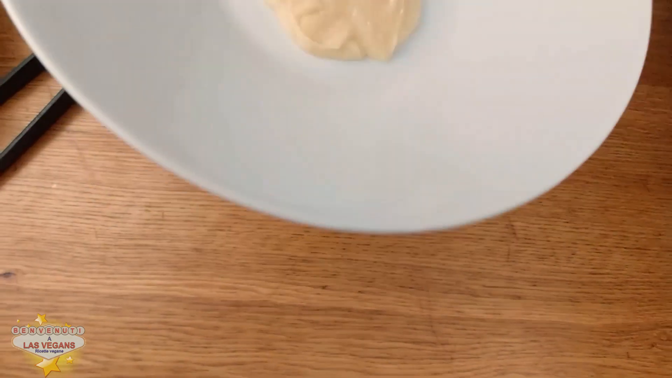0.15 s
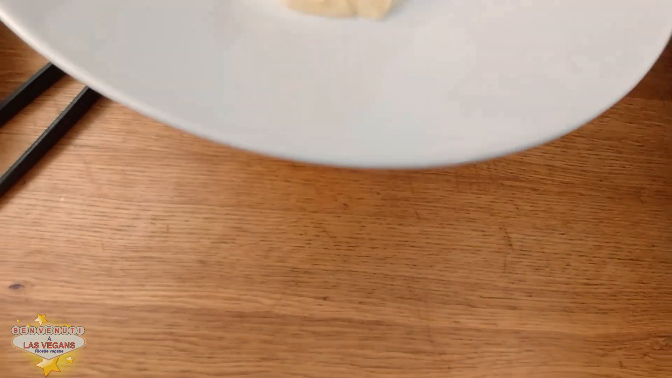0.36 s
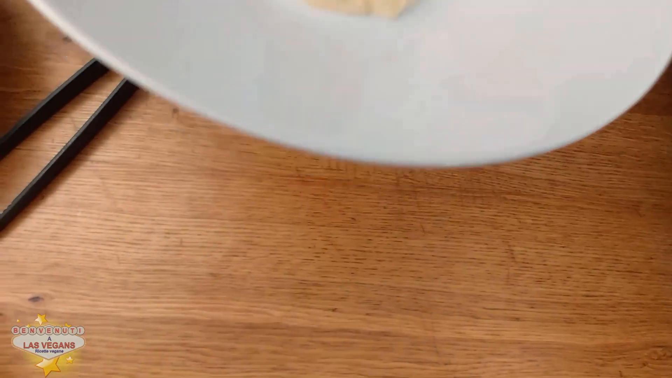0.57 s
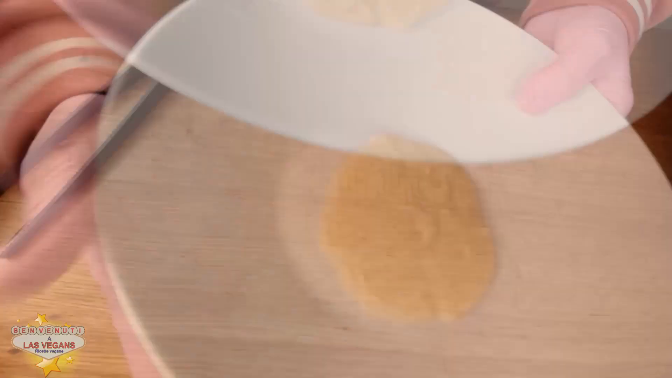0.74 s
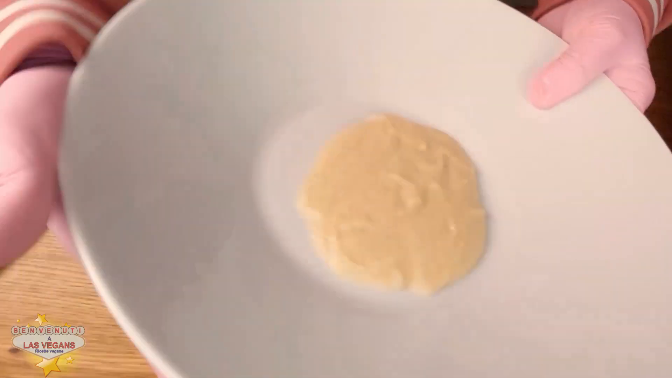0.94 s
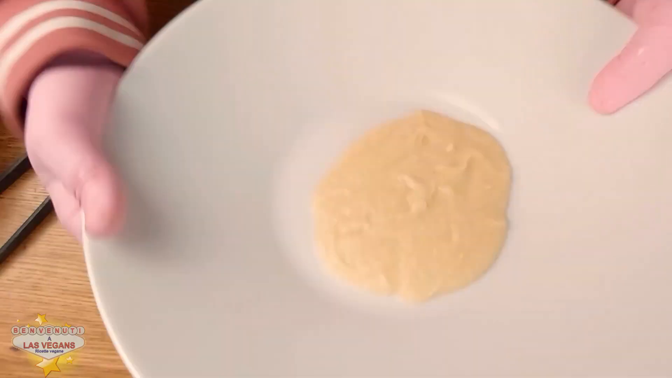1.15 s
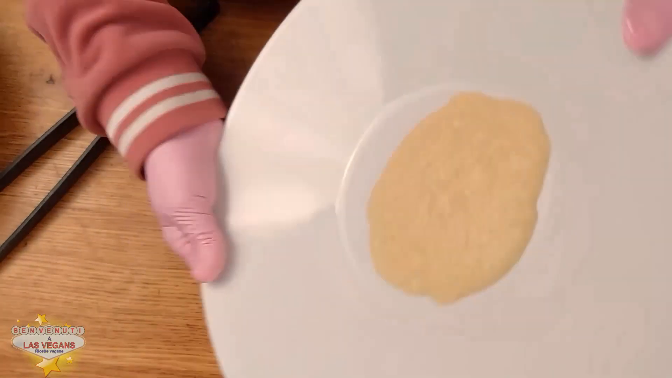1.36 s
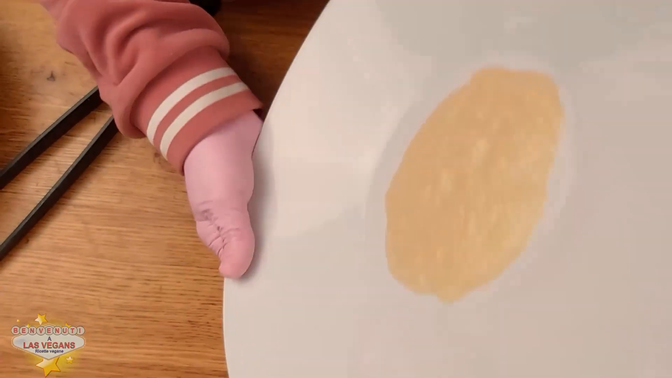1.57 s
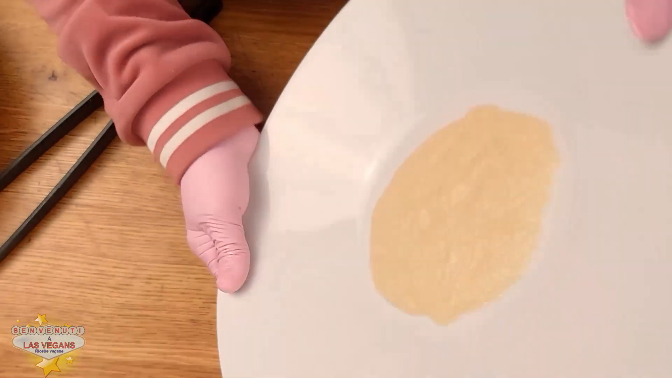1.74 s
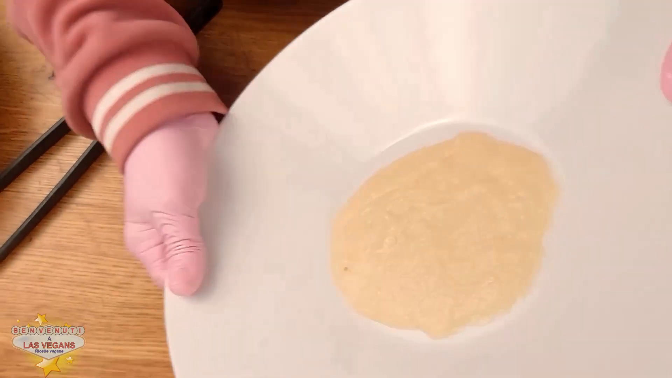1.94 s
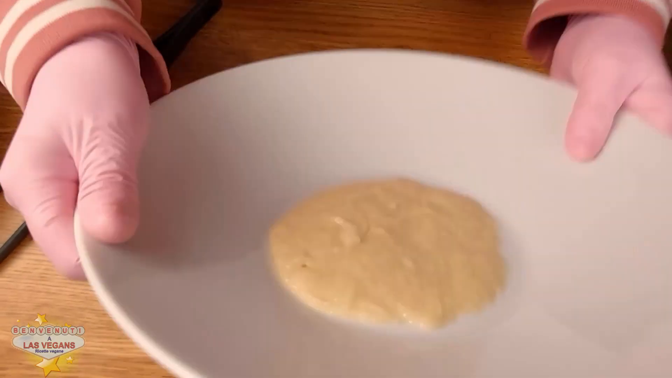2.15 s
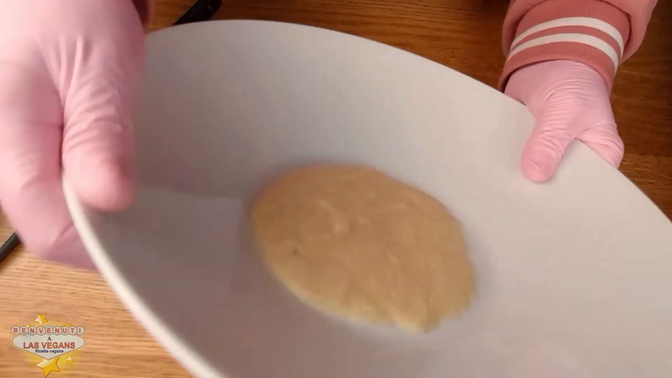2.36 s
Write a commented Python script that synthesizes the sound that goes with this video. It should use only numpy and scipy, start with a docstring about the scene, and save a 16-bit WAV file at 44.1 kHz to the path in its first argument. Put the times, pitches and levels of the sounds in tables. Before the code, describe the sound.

Close up in a small, slightly echoing kitchen, a ceramic plate raps on wood, strongest in the first second, with brief ringing; later only light ticks, soft low handling bumps and faint hiss over a hum.

```python
"""A small kitchen, heard close: a big ceramic plate is knocked on a wooden worktop and tilted in the hands.
From the start a wavering low hum, a sine over rumble noise, lies under a faint rubbing hiss of coloured noise.
Handling brings soft low thumps throughout, each a few sine cycles that sag in pitch.
Knocks come in clusters from the first moment, thinning out late: scrape, blow and rattle through filters
that colour them, ring the plate and echo in the room. The echo dips briefly near 0.9 s."""
import sys
import numpy as np
from scipy import signal
from scipy.fft import rfft, irfft
from scipy.io import wavfile
from scipy.ndimage import uniform_filter1d

SR = 44100
rng = np.random.default_rng(int(sys.argv[2]) if len(sys.argv) > 2 else 0)


def store_pcm(level_fs):
    """Save levels as 16-bit WAV."""
    pcm = np.round(np.clip(level_fs, -1, 1) * 32767).astype(np.int16)
    wavfile.write(sys.argv[1], SR, np.atleast_2d(pcm).T)


N = 105840
T = np.arange(N) / SR
FREQ = np.maximum(np.arange(N // 2 + 1) * SR / N, 1)  # the 0 Hz bin is raised to 1 so its log exists
TOP_HZ = 15700  # upper limit of the recorder


def undb(db):
    """Decibels to gain."""
    return 10 ** (np.asarray(db) / 20)


def on_log(hz, values):
    """Join points by straight lines over log frequency."""
    return np.interp(np.log(FREQ), np.log(hz), values)


def causal(gain):
    """Minimum-phase response with the given gain: it starts at once, with no ringing beforehand."""
    cepstrum = irfft(np.log(gain), N)
    cepstrum[1:N // 2] *= 2
    cepstrum[N // 2 + 1:] = 0
    return np.exp(rfft(cepstrum))


def noise(points):
    """Noise of rms 1 with a (Hz, dB) colour."""
    hz, db = np.array(points).T
    white = rfft(rng.standard_normal(N))
    coloured = irfft(white * undb(on_log(hz, db)), N)
    return coloured / coloured.std()


def walk(rate):
    """Slow random drift of spread near 1, with `rate` new values a second."""
    hold = int(SR / rate)
    steps = np.repeat(rng.standard_normal(N // hold + 1), hold)
    return uniform_filter1d(steps, hold)[:N]


# Colour of the room rumble at the microphone. Each row: frequency in Hz, relative level in dB.
RUMBLE_COLOUR = [(15, -42.5), (25, 5), (87, -5), (312, -23.5), (405, -22), (753, -25), (1020, -36),
                 (1460, -33.5), (1780, -47), (2010, -38.5), (3000, -35.5), (3900, -54), (6600, -120)]
RUMBLE_DB = -61
HUM_HZ, HUM_DB, HUM_WAVER_DB = 66.3, -59.5, 2


def hum():
    """A low sine drifting in pitch and level, over the rumble of the room."""
    pitch = HUM_HZ * (1 + 0.018 * walk(2.2))
    tone = np.sqrt(2) * np.sin(2 * np.pi * np.cumsum(pitch) / SR)  # rms 1
    level = undb(HUM_DB + HUM_WAVER_DB * walk(8.3))
    return tone * level + undb(RUMBLE_DB) * noise(RUMBLE_COLOUR)


# Rubbing hiss from start to end. Each row: time in seconds, level in dB before the flicker.
RUB_LEVEL = [(0, -65.5), (.15, -80.5), (.4, -73), (.9, -72), (1.03, -64), (1.12, -72), (1.3, -66.5),
             (1.5, -67), (1.7, -63.5), (1.76, -65.5), (1.79, -60.5), (1.84, -66.5), (1.95, -67), (2.1, -66),
             (2.4, -66)]
# Colour of that hiss. Each row: frequency in Hz, relative level in dB per Hz.
RUB_COLOUR = [(590, -30.5), (1000, -6), (1430, -6.5), (1870, -4.5), (2250, -8), (2620, -4), (4210, 5),
              (6400, -2), (8650, 0.5), (12700, -4.5), (16000, -25)]
RUB_FLICKER_DB, RUB_FLICKER_HZ = 0.7, 28


def rubbing():
    """Faint hiss of hands and sleeves sliding on the glaze: coloured noise with a flickering level."""
    time, db = np.array(RUB_LEVEL).T
    hiss = noise(RUB_COLOUR)
    flicker = -RUB_FLICKER_DB * walk(RUB_FLICKER_HZ)
    return hiss * undb(np.interp(T, time, db) + flicker)


# Handling thumps. Each row: start in seconds, level in dB before the envelope,
# settled pitch in Hz, decay in seconds before the envelope's 1.245 stretch.
HANDLING_THUMPS = [(.0005, -42.5, 68.2, 0.025), (0.2074, -27, 54.4, 0.009), (0.4052, -26, 52.5, 0.01),
                   (0.495, -41.5, 64, 0.057), (.549, -22, 69.1, 0.026), (0.566, -26, 71, 0.0097),
                   (0.774, -26.5, 54.4, 0.0049), (.865, -44, 66.6, 0.014), (0.973, -34, 61.7, 0.023),
                   (1.003, -24.5, 55, 0.0032), (1.049, -36.5, 63, 0.012), (1.183, -35.5, 59, 0.0081),
                   (1.327, -34.5, 59.3, 0.022), (1.475, -47, 71.4, 0.016), (1.53, -54, 103.4, 0.025),
                   (1.578, -42.5, 66.3, 0.053), (1.613, -41.5, 68.3, 0.019), (1.667, -36, 55, 0.073),
                   (1.741, -36, 61.3, 0.037), (1.9, -43, 62.3, 0.044), (2.076, -31.5, 58.3, 0.024),
                   (2.153, -29.5, 59.8, 0.019), (2.234, -30, 60, 0.014)]
THUMP_ATTACK_S, THUMP_SETTLE_S = 0.0025, 0.01
THUMP_SHARP = 0.55  # starts this fraction above the settled pitch
THUMP_GRIT_DB = -20.5


def thumps():
    """Soft pushes give a few low cycles that sag in pitch, with a little dull rustle."""
    out = np.zeros(N)
    grit = noise([(60, -5.5), (130, 5.5), (230, -5), (400, -19.5), (1500, -32.5), (6000, -69.0)])
    for at, db, hz, decay in HANDLING_THUMPS:
        age = np.maximum(T - at, 0)
        sag = THUMP_SHARP * THUMP_SETTLE_S * (1 - np.exp(-age / THUMP_SETTLE_S))
        turns = hz * (age + sag)
        attack = 1 - np.exp(-age / THUMP_ATTACK_S)
        envelope = attack * np.exp(-(age / decay / 1.245) ** 1.3)
        out += undb(db) * envelope * (np.sin(2 * np.pi * turns) + undb(THUMP_GRIT_DB) * grit)
    return out


def contact(at, scrape_ms, rattle_ms, share):
    """Spectrum of a swelling scrape, one blow and a dying rattle, evened to be broadly flat."""
    ms = (T - at) * 1000
    fade = np.where(ms < 0, -ms / scrape_ms, ms / rattle_ms)
    force = rng.standard_normal(N) * np.exp(-np.minimum(fade, 20))
    force *= np.sqrt((1 - share) / np.sum(force ** 2))
    force[max(int(at * SR), 0)] += np.sqrt(share)  # the blow is a single sample
    spectrum = rfft(force)
    return spectrum / np.sqrt(uniform_filter1d(np.abs(spectrum) ** 2, size=1600))


# Ringing modes of the plate. Each row: frequency in Hz, lift over the contact noise in dB
# before each knock's ring level, time to fall 60 dB in seconds.
PLATE_MODES = [(969, 2, .15), (1233, -5.5, 0.086), (1454, -4, 0.078), (1504, -4, 0.089), (1700, -2, 0.1),
               (1961, -5, 0.091), (2360, -9, .05), (2433, -3.5, .3), (2790, -5.5, .06), (3080, -3.5, 0.013),
               (3570, -2.5, .022), (4520, 3.5, 0.2), (4592, 7, 0.025), (4710, 4.5, .42), (4300, -5.5, .05),
               (5930, -6.5, .04)]


def plate():
    """Frequency response of the ceramic: a sum of damped resonances."""
    response = 0
    for hz, db, t60 in PLATE_MODES:
        detune = (FREQ - hz) * 2 * np.pi * t60 / np.log(1000)
        response = response + undb(db) / (1 + 1j * detune)
    return response


# Reverberation of the kitchen. Each row: band centre in Hz, reverberant level in dB
# before each knock's room level, time to fall 60 dB in seconds.
KITCHEN_BANDS = [(100, -12.5, 0.41), (216, -12.5, 0.58), (260, -4.5, 0.37), (470, -1, 0.37),
                 (696, -16, 0.42), (1510, -10, 0.5), (2480, -12.5, .38), (4400, -9.5, 0.45),
                 (8010, -13.5, 0.24), (14000, -14.5, 0.53)]
ROOM_DELAY_S, ROOM_BUILD_S = 0.003, 0.0033


def kitchen():
    """Response of the room: a diffuse tail with its own level and decay in each band."""
    hz, db, t60 = np.array(KITCHEN_BANDS).T
    white = rfft(rng.standard_normal(N))
    build = np.clip((T - ROOM_DELAY_S) / ROOM_BUILD_S, 0, 1)
    tail = 0
    # each identity row picks one band, fading into its neighbours
    for band, gain, decay in zip(np.eye(len(hz)), undb(db), t60):
        envelope = build * np.exp(-np.log(1000) * T / decay)
        envelope = envelope / np.sqrt(np.sum(envelope ** 2))
        tail = tail + gain * irfft(white * on_log(hz, band), N) * envelope
    return tail


# Knocks on the worktop. Each row: time in seconds, scrape before the blow in ms, rattle decay in ms,
# blow share of the energy 0-1 before evening, contact resonance in Hz, its lift in dB, plate ring in dB,
# then boom, wood, clack, clink and edge levels in dB before that lift, and level sent to the room in dB.
WORKTOP_KNOCKS = [ (.003, 0.87, 3.6, 0.03, 1960, 12, -1, -3, -23.5, -21, -15, -26, -9),
                  (0.1969, 1.4, 2.3, 0, 2530, 14.5, -21, -16.5, -3, -17.5, -19.5, -27.5, 11.5),
                  (0.206, 0.94, 2.2, 0, 1424, 9, -5, 10, 6.5, 2, -3, -11, -7.5),
                  (0.375, 0.87, 2.2, 0.2, 3700, 13, -12, -23, -24, -41, -29, -45, -9),
                  (0.4006, 0.67, 4.35, 0, 280, 2.5, 2, 17, 21, 5.5, -0.5, -7.5, -2),
                  (0.581, 0.25, 6, 0.04, 1024, 20.5, 3.5, 3, -14.5, 9, 5.5, -12, 0),
                  (0.5852, 1.34, 1.4, 0.32, 2140, 6, -11, 8, -1, 13, 8.5, 3, -2),
                  (0.7716, 0.52, 1.7, 0.04, 877, 12.5, -6.5, 6.5, 3, 0, 6.5, 2, -3),
                  (.7765, 1.9, 1.8, .05, 1560, 18, -9, -22, -32, -10.5, -27, -20, -9),
                  (.805, 1.8, 4, 0, 1585, 3, 2, -11.5, -21, -13.5, -23, -21.5, -17),
                  (0.992, .5, 5.2, 0, 1474, 10, 4.5, -10.5, -25, -15, -15.5, -24, -4.5),
                  (0.9975, 1.5, 4.4, .01, 3620, 14.5, 4.5, -14, -28, -15, -28.5, -21, -18),
                  (1.0143, 3.1, 4.4, 0.15, 4360, 8.5, -5, -20, -41, -23.5, -23, -25.5, -8),
                  (1.1795, 2.1, 4.1, 0.37, 1590, 8.5, 0, -10.5, -19.5, -12, -10.5, -20, -4.5),
                  (1.3216, 0.52, 1.37, 0, 2280, 5.5, -9.5, -27, -26, -20, -16, -27.5, 0),
                  (1.4065, 1.4, 2.8, 0.18, 2350, 16, -7, -38, -38, -37.5, -35.5, -54.5, -7),
                  (1.518, 1.8, 2.7, .05, 2175, 9, -5.5, -44, -56, -36.5, -42, -36.5, -12.5),
                  (2.073, 2.3, 4.8, 0, 5000, -2.5, 0.5, -54.5, -54, -49.5, -23.5, -23.5, -12),
                  (2.0852, 0.37, 0.57, 0.1, 4050, 5, -8, -38, -45.5, -43, -22.5, -22.5, 1.5),
                  (2.1891, 1.06, 2.3, 0, 2760, 5, -13, -24, -57, -32, -24, -26, 8)]
# Centres of boom, wood, clack, clink and edge, in Hz.
COLOUR_HZ = (350, 750, 1600, 4000, 9000)
# Brief dip in the echo level. Each row: time in seconds, echo gain in dB.
ECHO_DIP = [(.83, 1), (.89, -9), (.94, -8.5), (.99, -1)]
SUB_DB = -5  # at 150 Hz, relative to boom
EDGE_TOP_HZ, EDGE_TOP_DB, AIR_DB = 10860, -1.5, -14.5  # both levels relative to edge; air is at TOP_HZ
CONTACT_OCTAVES = 0.23  # spread of the contact resonance
RATTLE_ABOVE_HZ = 730  # well below this a contact is one clean push
RING_TO_ROOM_DB = -6


def knocks():
    """Every contact has its own colour, rings the plate and echoes in the kitchen."""
    direct, sent, ringing = 0, 0, plate()
    clean = 1 / np.sqrt(1 + (FREQ / RATTLE_ABOVE_HZ) ** 6)
    colour_points_hz = [40, 150, *COLOUR_HZ, EDGE_TOP_HZ, TOP_HZ]
    for at, scrape, rattle, share, hz, lift, ring, *tone, room in WORKTOP_KNOCKS:
        boom, edge = tone[0], tone[-1]
        db = on_log(colour_points_hz, [boom - 10, boom + SUB_DB, *tone, edge + EDGE_TOP_DB, edge + AIR_DB])
        octaves_away = np.log2(FREQ / hz)
        db = db + lift * np.exp(-.5 * (octaves_away / CONTACT_OCTAVES) ** 2)
        colour = causal(undb(db))
        push = np.exp(-2j * np.pi * FREQ * at)  # an impulse at the knock
        force = clean * push + (1 - clean) * contact(at, scrape, rattle, share)
        direct = direct + colour * force * (1 + undb(ring) * ringing)
        # the room hears the push alone, with less of the ring
        sent = sent + undb(room) * colour * push * (1 + undb(ring + RING_TO_ROOM_DB) * ringing)
    echo = signal.fftconvolve(irfft(sent, N), kitchen())[:N]
    time, dip_db = np.array(ECHO_DIP).T
    return irfft(direct, N) + echo * undb(np.interp(T, time, dip_db))


def scene():
    """All sources together, placed slightly to the right by level alone."""
    balance_db = np.array([[-1.25], [1.25]]) / 2  # left, right
    return (knocks() + thumps() + rubbing() + hum()) * undb(balance_db)


def record(dry):
    """The recorder cuts the deepest rumble below 27 Hz and the top above TOP_HZ."""
    low_cut = signal.butter(3, 27, "high", fs=SR, output="sos")
    top_cut = signal.ellip(8, .2, 80, TOP_HZ, fs=SR, output="sos")
    return signal.sosfilt(top_cut, signal.sosfilt(low_cut, dry))


dry = scene()
out = record(dry)
store_pcm(out)
```